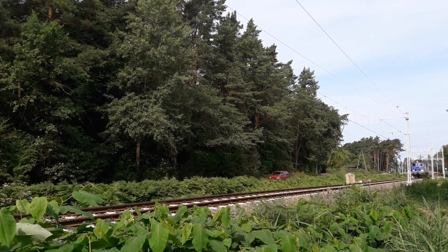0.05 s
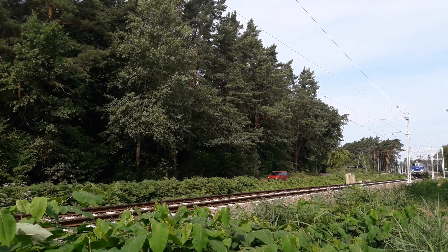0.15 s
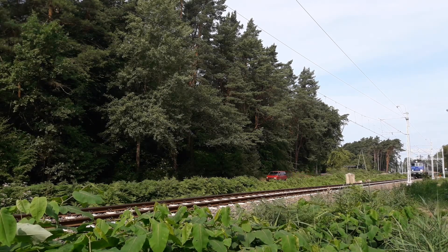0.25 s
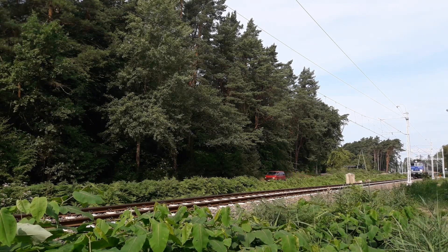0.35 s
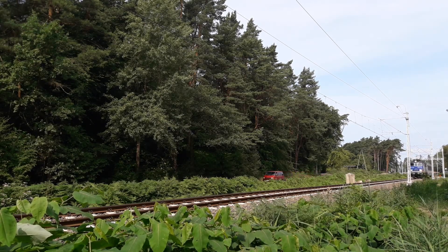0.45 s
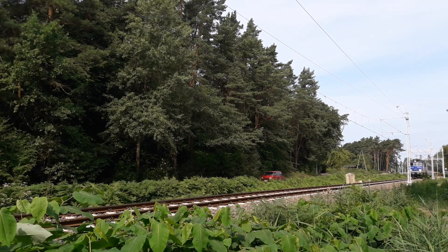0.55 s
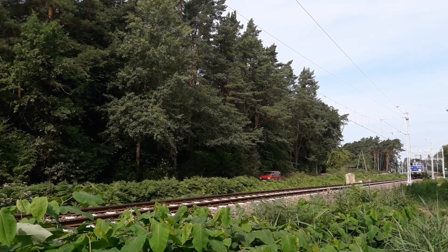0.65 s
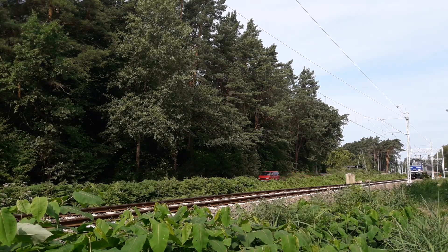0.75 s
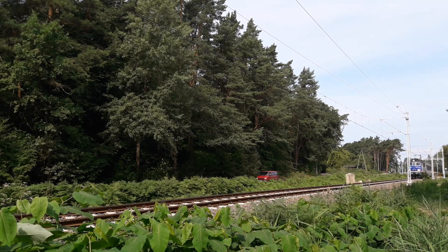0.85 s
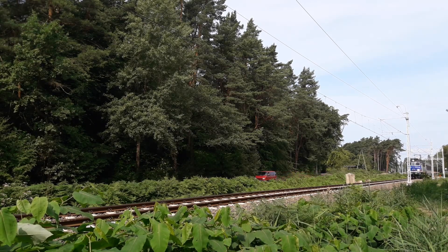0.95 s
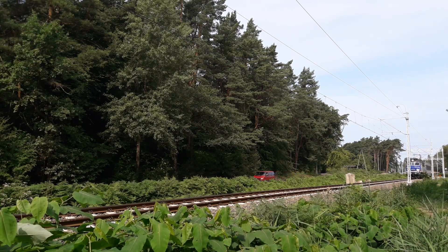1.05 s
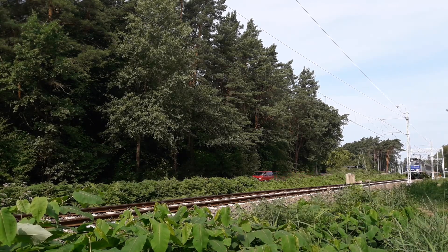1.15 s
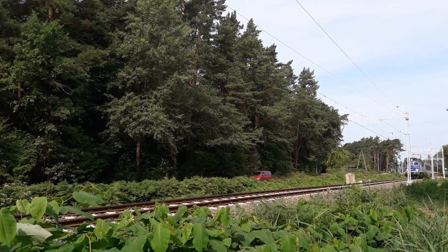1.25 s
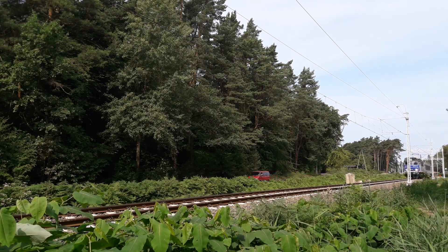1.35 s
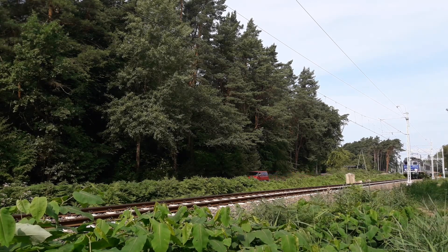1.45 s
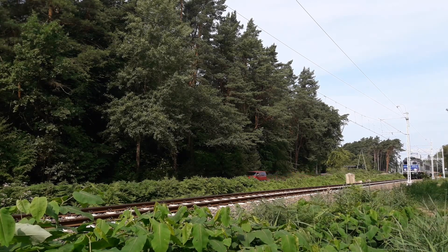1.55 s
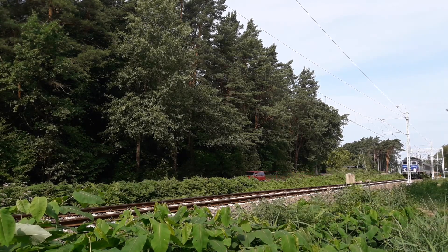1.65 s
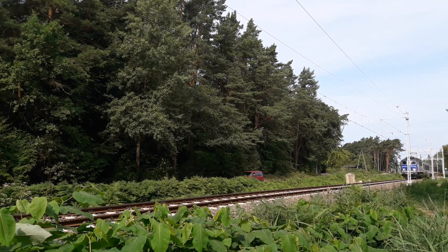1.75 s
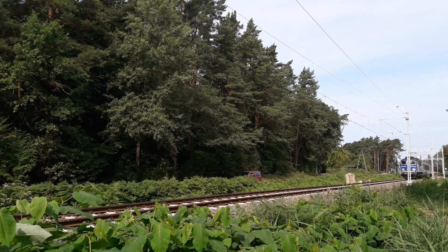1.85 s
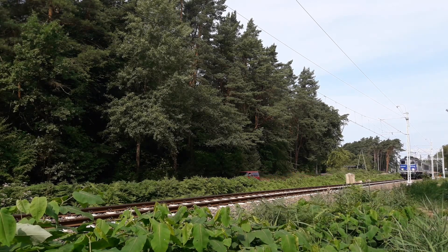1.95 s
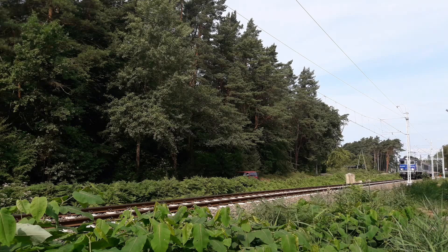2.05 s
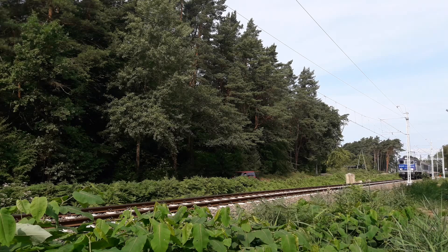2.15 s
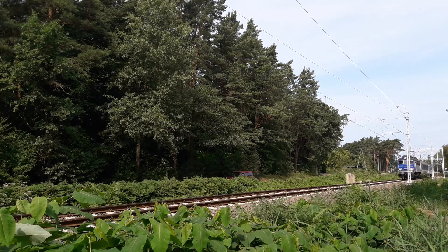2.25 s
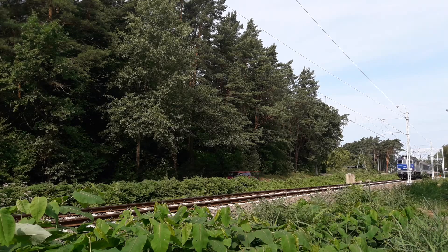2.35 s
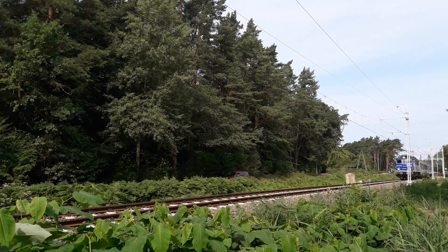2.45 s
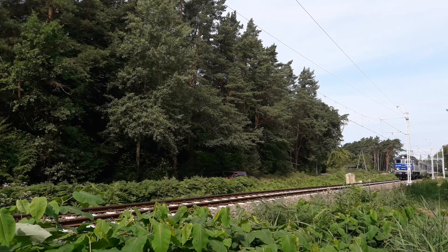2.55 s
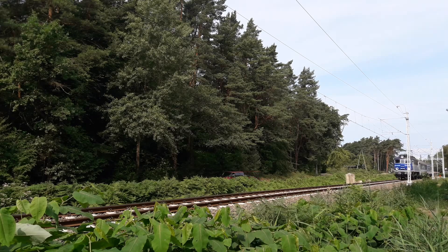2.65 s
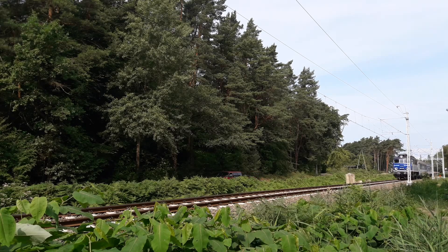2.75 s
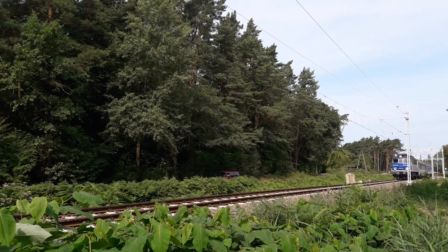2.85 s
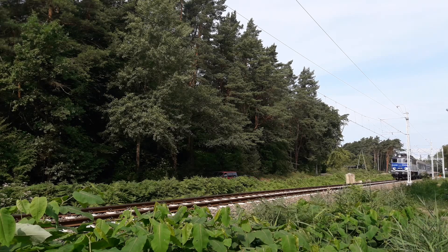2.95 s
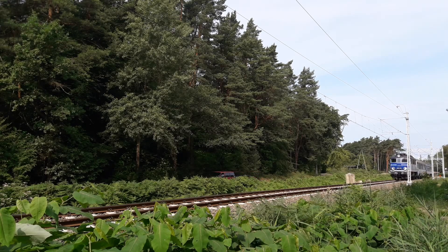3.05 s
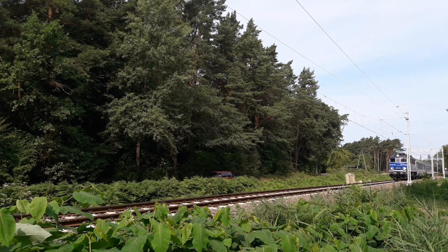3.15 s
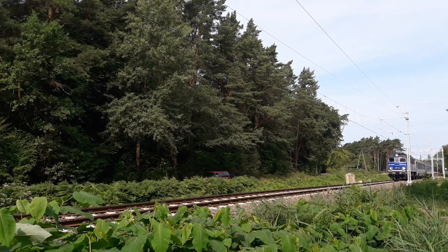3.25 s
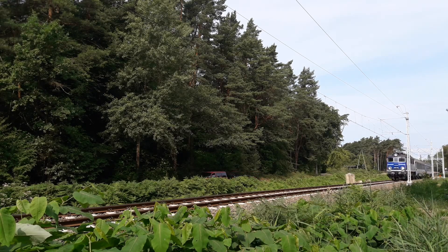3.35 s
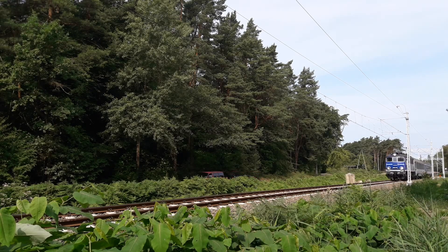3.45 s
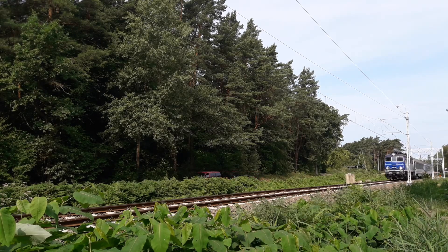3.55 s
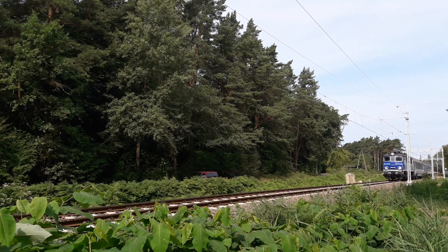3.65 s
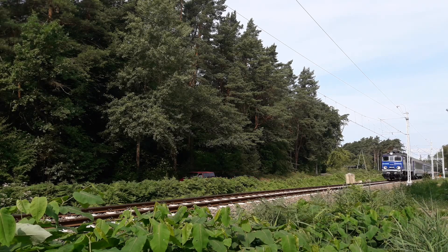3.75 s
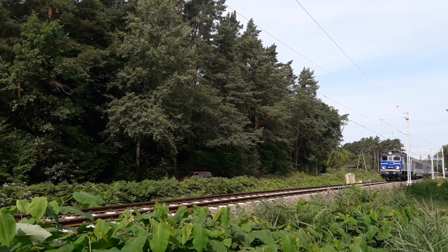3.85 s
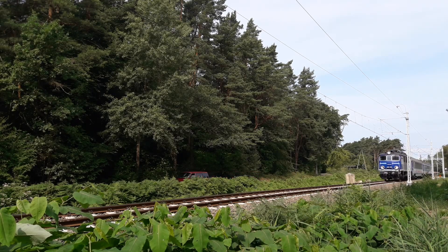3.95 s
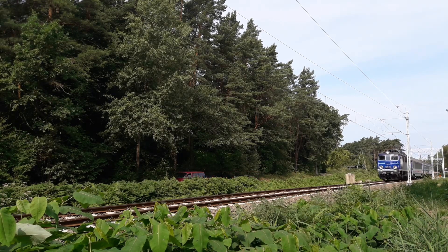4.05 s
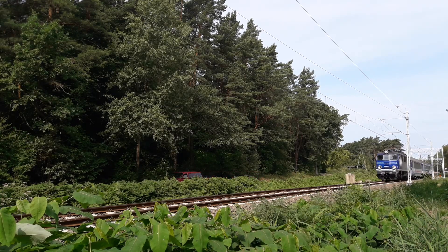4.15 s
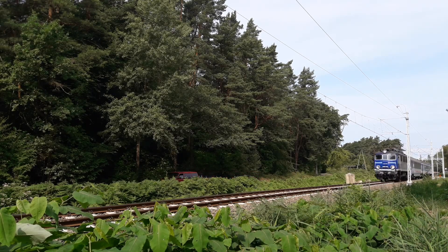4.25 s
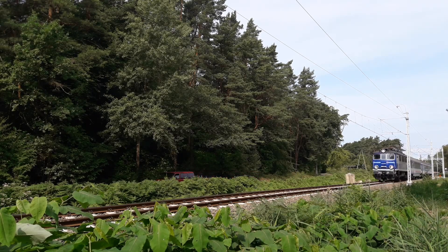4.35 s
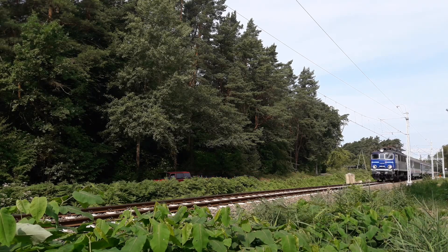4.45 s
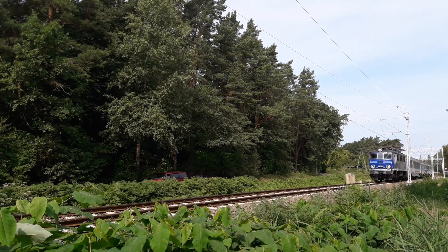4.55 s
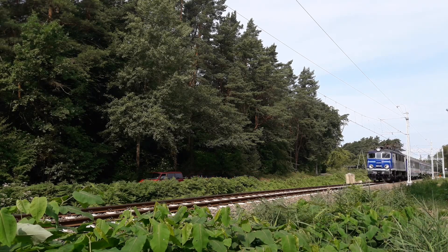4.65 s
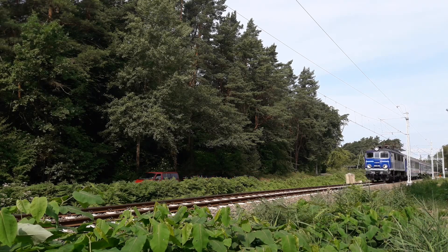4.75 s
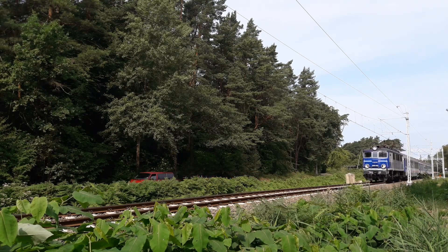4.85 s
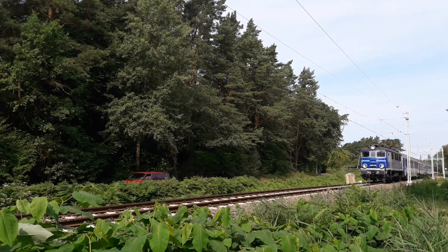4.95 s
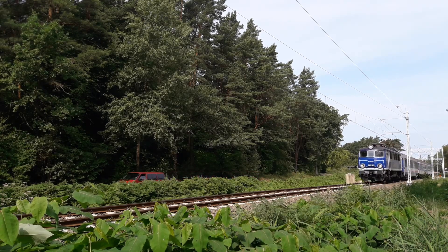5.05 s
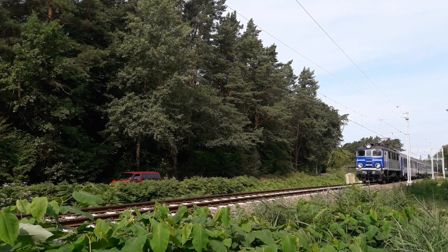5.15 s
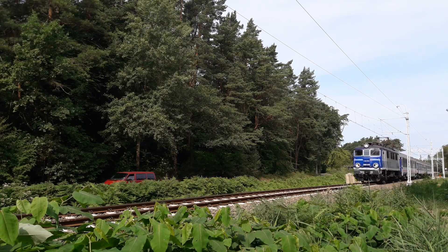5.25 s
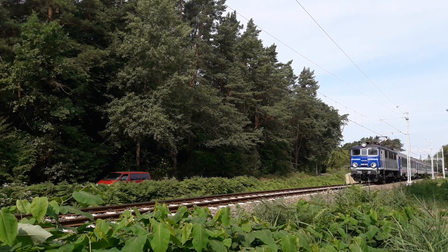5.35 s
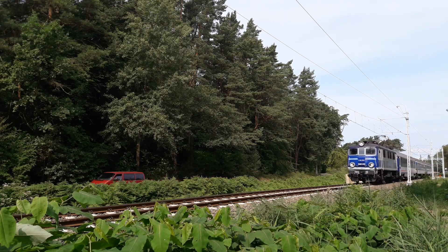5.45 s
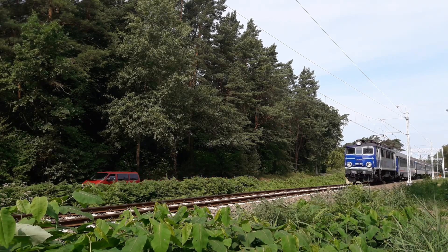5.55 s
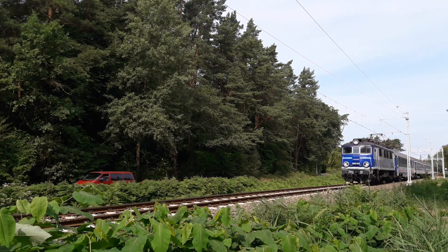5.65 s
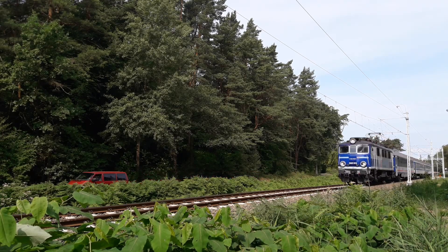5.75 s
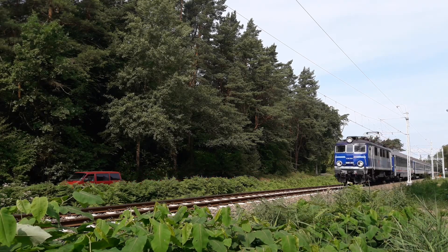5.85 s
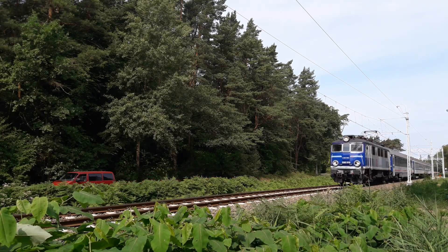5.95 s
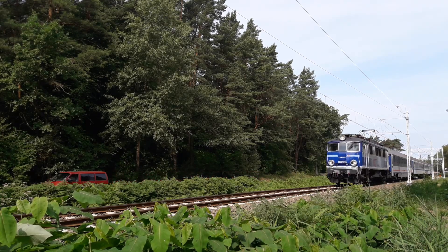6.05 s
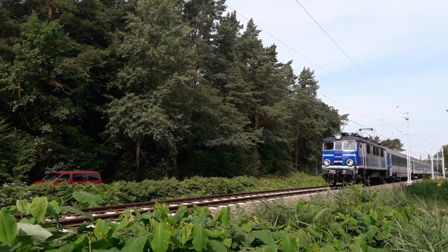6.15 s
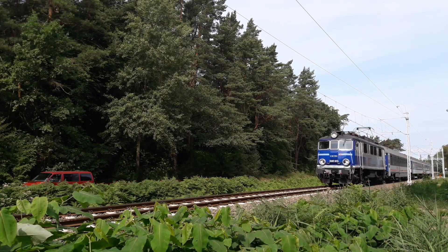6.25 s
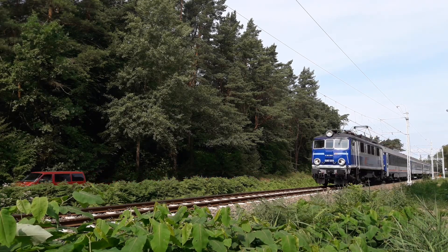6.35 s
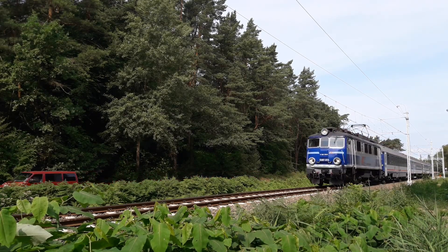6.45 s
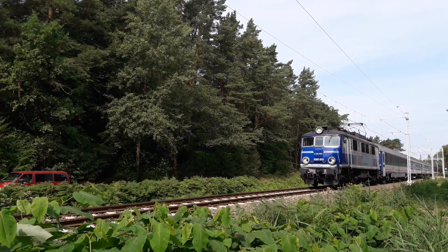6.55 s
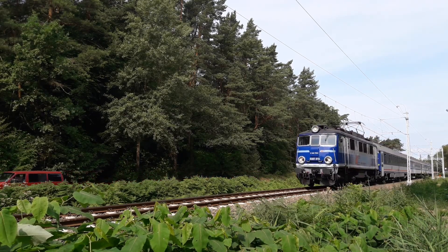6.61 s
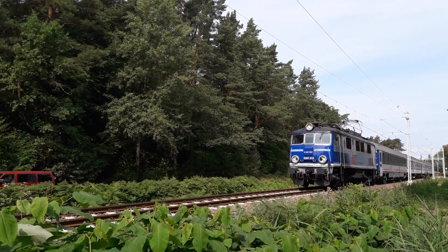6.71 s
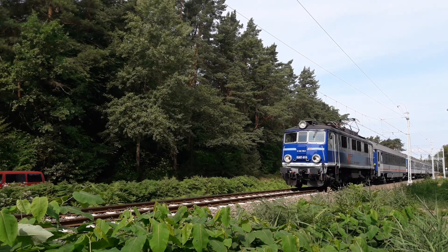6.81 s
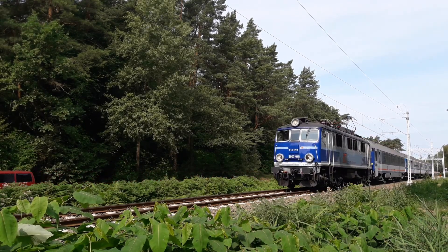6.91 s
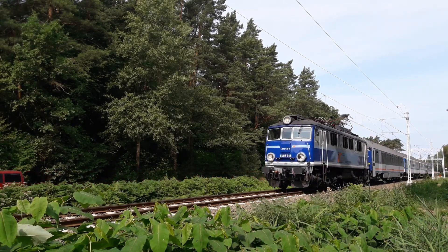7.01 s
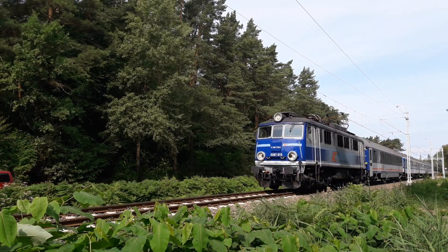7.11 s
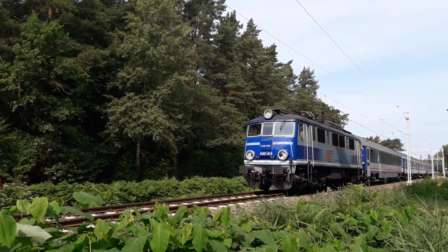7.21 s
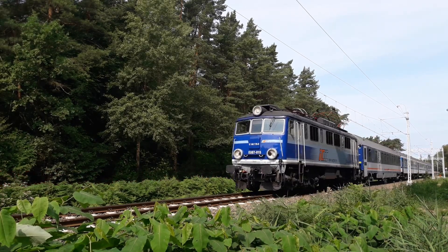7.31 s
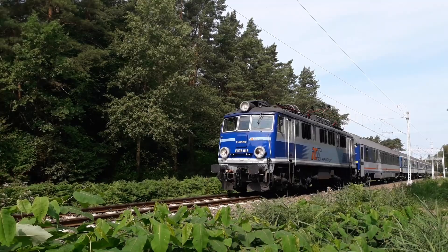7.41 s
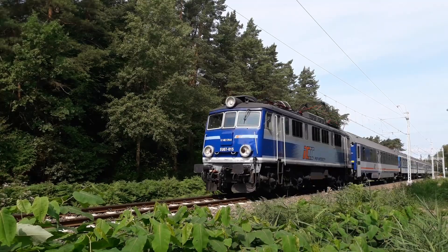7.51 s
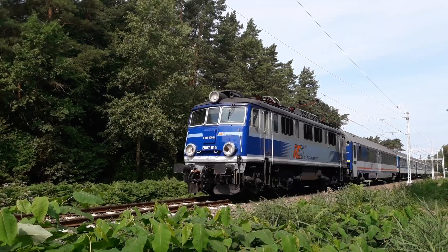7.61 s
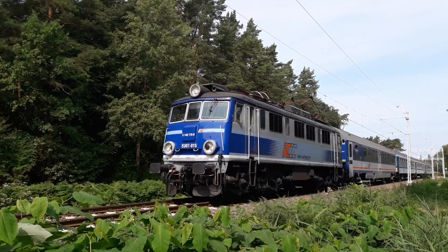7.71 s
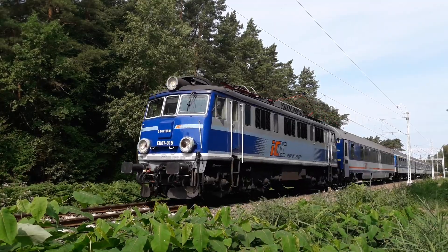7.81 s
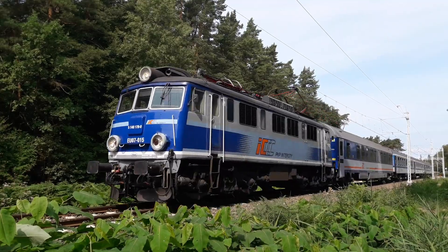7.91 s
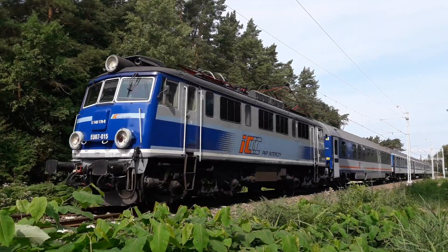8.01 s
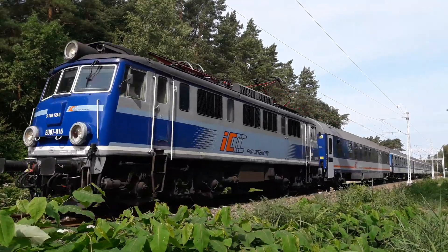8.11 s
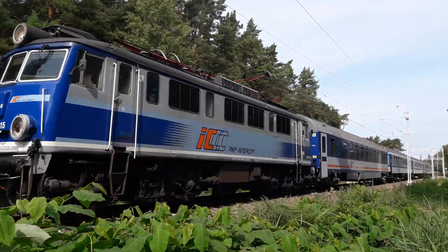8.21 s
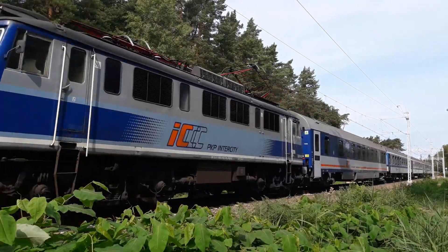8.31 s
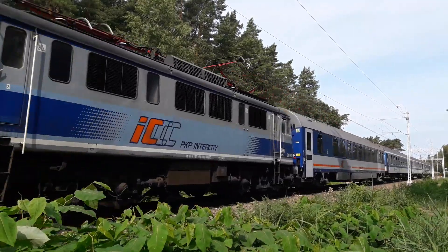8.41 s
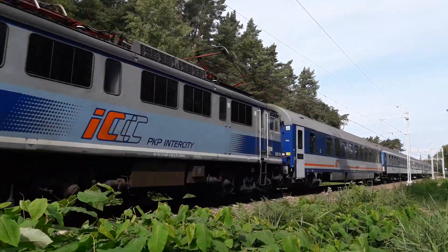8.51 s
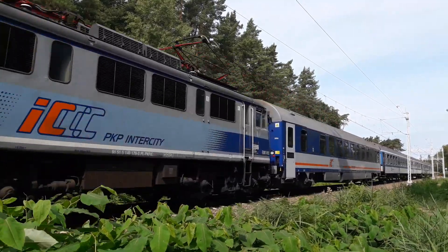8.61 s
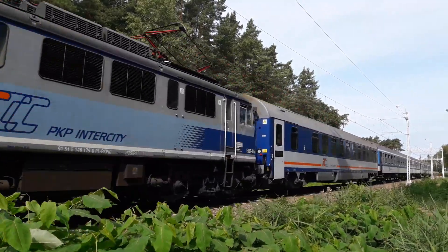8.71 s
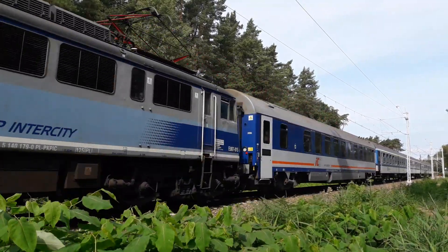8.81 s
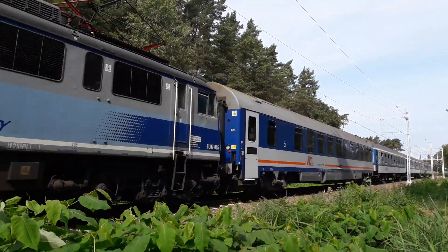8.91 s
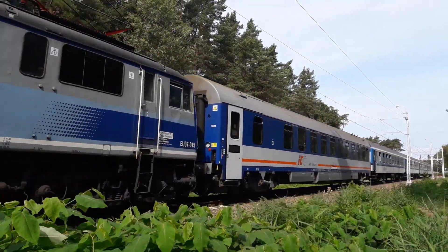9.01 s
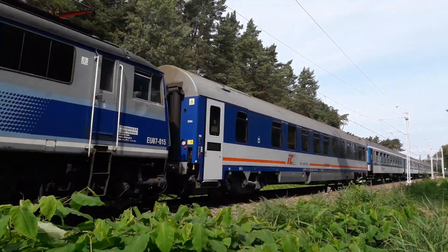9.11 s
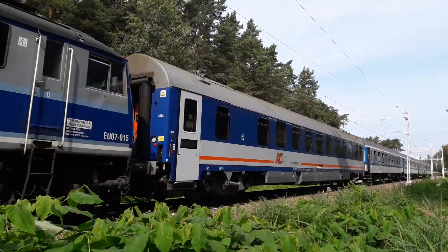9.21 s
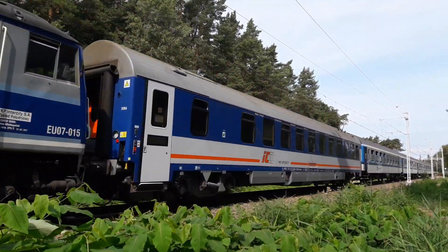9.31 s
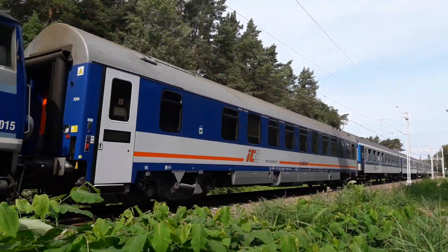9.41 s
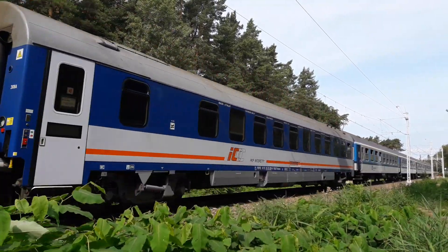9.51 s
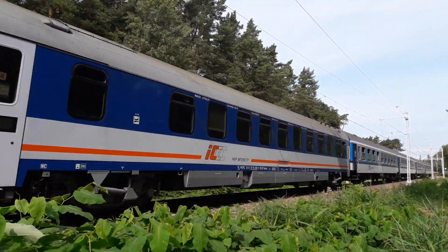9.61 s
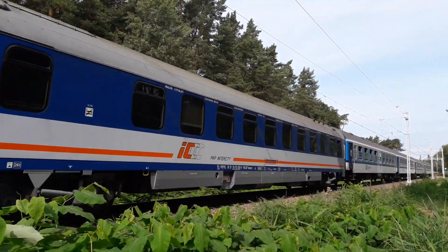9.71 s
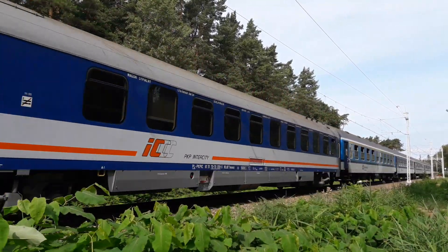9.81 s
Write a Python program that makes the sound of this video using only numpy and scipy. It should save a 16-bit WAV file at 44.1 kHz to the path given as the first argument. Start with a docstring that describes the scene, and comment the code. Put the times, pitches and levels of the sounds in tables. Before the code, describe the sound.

Heard from beside a railway line at a forest edge, the last of a distant horn fades out. An electric train draws near, its quiet rumble and singing rails swelling steadily under a wavering gear whine. The locomotive passes close and loud, its whine dropping in pitch as it goes by, and the first coach follows with knocks, hissing, ringing wheels and brief high swishes.

```python
"""Electric train at the forest edge

The last of a horn blast dies in the trees. The rails sing ahead of an electric locomotive and its
coaches, and the drive gears whine ever louder. Ground rumble, knocks and the hiss of steel on steel
swell as the first bogies pass close by, with ringing wheels and brief falling treble swishes."""
import sys
import numpy as np
from scipy import signal
from scipy.fft import rfft, irfft, next_fast_len
from scipy.io import wavfile
from scipy.ndimage import map_coordinates

SR = 44100
rng = np.random.default_rng(int(sys.argv[2]) if len(sys.argv) > 2 else 0)


def master_out(mix):
    """Clip the mix to full scale and print it as 16-bit PCM to the path in sys.argv[1]."""
    frames = np.transpose(np.atleast_2d(mix))
    ceiling = np.clip(frames, -1, 1)
    pcm = np.round(ceiling * 32767).astype(np.int16)
    wavfile.write(sys.argv[1], SR, pcm)


N = 435266
TIME = np.arange(N) / SR

# Noise colours, some as a far and near pair. Each row: frequency in Hz, relative level in dB.
GROUND_FAR = [(20, -38), (36, -22), (50, -6), (62, -12), (80, -1), (103, 2), (140, -1.5), (185, -3),
              (230, -10), (330, -44.5)]
GROUND_NEAR = [(20, -47), (36, -29), (50, -15), (62, -8), (80, -4.5), (108, 0.5), (135, -1.5), (180, 2),
               (230, -3.5), (330, -34.5)]
SLEEPERS_FAR = [(150, -29), (220, -4.5), (300, -1), (370, 1), (440, -3), (540, 4), (680, -6.5), (950, -39)]
SLEEPERS_NEAR = [(150, -28), (220, 2), (320, 1), (450, -1), (560, -2.5), (680, -19), (950, -37.5)]
RAILS_FAR = [(380, -22), (480, -10.5), (630, -5.5), (720, 4), (840, 0), (900, -3), (970, -0.5),
             (1060, -10.5), (1150, 2), (1215, 5), (1275, -3), (1340, 3.5), (1480, -13.5), (1900, -53)]
RAILS_NEAR = [(420, -30), (600, 3.5), (720, 5), (810, 1), (890, 5.5), (1000, 4), (1100, 0), (1230, 2.5),
              (1400, -3), (1550, -10), (1900, -25.5)]
WHEELS_FAR = [(1700, -20), (2300, 0.5), (3000, -1), (3700, 0.5), (4450, 0), (5000, -8), (5600, -10.5),
              (6800, -11.5), (7300, -35), (7750, -24), (8200, -16), (15000, -31.5)]
WHEELS_NEAR = [(1800, -24), (2400, 2), (3000, 4.5), (3500, -0.5), (4000, 1), (4450, -1.5), (4900, -6.5),
               (5600, -9.5), (6500, -12.5), (7300, -12), (8500, -14), (15000, -41)]
ROAR = [(900, -22), (1350, -2.5), (1550, 2.5), (1800, 3), (2000, -1), (2300, -6.5), (2700, -15),
        (4000, -27.5)]
SIZZLE = [(6500, -19), (8600, -11), (9600, 0), (10800, 5), (11700, -2), (12700, 3), (13500, 3), (14500, -6),
          (16000, -8)]
HISS = [(3000, -10), (8000, -5), (10200, -4), (11500, 2.5), (16000, 2)]
BREEZE = [(15, -27), (32, -18), (50, 10), (65, 7), (100, -9), (200, -63)]
KNOCK_COLOUR = [(450, -24), (720, 10), (1000, 5), (1400, -16), (4000, -34), (9000, -58)]
THUD_COLOUR = [(50, -26), (85, -6), (120, -1), (160, -9), (260, -52)]
# The microphone's dull top and its steep cutoff. Each row: frequency in Hz, gain in dB.
MICROPHONE_EQ = [(20, 2.5), (7100, -0.5), (7550, -10.5), (8050, -18), (9000, -17.5), (16000, -25)]
HIGH_CUT = [(15700, 0), (15850, -90)]

# The horn's timbre. Each row: harmonic number, relative level in dB.
HORN_HARMONICS = [(1, -4.5), (2, -5.5), (3, -25), (4, -24), (5, -36)]
# The blowers' two-note hum. Each row: pitch in Hz, relative level in dB.
BLOWER_TONES = [(401.4, 1.5), (177.4, 0)]
# Swells of blower hum and low rumble. Each row: level in dB, peak time and half-width in seconds.
BLOWER_SWELLS = [(-36, 7.0, .2), (-42, 7.7, .6)]
RUMBLE_SWELLS = [(-45, 2.83, 0.33), (-43, 5.9, 0.22), (-38, 7.37, 0.28)]
# Wheel knocks and running-gear thuds. Each row: start in seconds, relative level in dB.
KNOCKS = [(4.19, -19), (5.512, -10), (7.543, -10), (8.104, -10), (8.153, -14.5), (9.15, -9), (9.434, -12),
          (9.525, -6)]
THUDS = [(0.381, -32), (3.189, -29), (3.559, -28), (6.369, -22), (8.303, -22), (8.729, -21.5),
         (9.247, -34.5), (9.599, -26)]

# The cross-fade from far to near colours. Each row: time in seconds, closeness from 0 to 1.
CLOSENESS = [(0, 0.07), (3, 0.24), (5, 0.17), (6.5, 0.44), (7.5, 0.91), (8.2, 0.96), (9.87, 0.85)]
# Two bogies under the locomotive, then the coaches'.
# Each row: time abreast in seconds, weight on the track in dB, wheel noise in dB.
BOGIES = [(8.22, -1.0, .1), (8.75, -3.4, -.2), (9.35, 3.9, -1.0), (10.25, 1.3, -6.5), (10.55, 1.3, -6.5)]
# How each sound of a bogie carries.
# Each gives: base level in dB, distance abreast in metres, dB lost per doubling, dB lost per metre.
GROUND_CARRY = (-32.5, 14.5, 6, 0.02)
SLEEPERS_CARRY = (-23.3, 10.5, 5, 0.054)
RAILS_CARRY = (-25.8, 11, 4.2, 0.0168)
ROAR_CARRY = (-27, 8, 5.25, 0.024)
WHEELS_CARRY = (-26.8, 6, 5.5, 0.044)
SIZZLE_CARRY = (-33.2, 6.5, 5.5, 0.058)
# The bounce off the ground. Each row: time in seconds, first notch in Hz, strength from 0 to 1.
GROUND_ECHO = [(0, 5350, .13), (5.5, 4800, 0.12), (6.7, 3340, 0.25), (8, 2861, 0.53), (9.35, 2460, 0.25),
               (9.55, 2000, 0.34), (9.87, 1250, 0)]
# Treble accents: a soft band of hiss near 7 kHz swells and fades around 6.75 s, two brief falling swishes (5900
# and 11800 Hz) come as the coach passes, and the rest are ringing wheels. Each row: centre in Hz, scatter in
# Hz, level in dB, peak time and half-width in seconds, fall in Hz per second.
TREBLE_ACCENTS = [(1516, 22, -31.5, 8.87, .16, 5), (1520, 20, -31, 9.6, .3, 5),
                  (2930, 150, -37, 9.0, .4, 60), (2520, 260, -32, 9.67, .14, 1500),
                  (4490, 110, -47, 7.1, .7, 50), (4350, 45, -35.5, 8.45, .25, 160),
                  (7100, 500, -52, 6.75, .55, 0), (11130, 70, -51, 7.32, .22, 60),
                  (10450, 400, -46, 8.0, .2, 700), (13280, 80, -45.5, 8.12, .17, 100),
                  (13900, 400, -47.5, 7.9, .22, 900), (12900, 400, -44, 8.85, .04, 900),
                  (5900, 400, -42, 9.42, .07, 3000), (11800, 400, -45, 9.37, .09, 5000)]

# The gear mesh, climbing as the train gathers speed. Each row: time in seconds, pitch in Hz.
GEAR_PITCH = [(0, 233.9), (3.3, 236.7), (5.3, 242.3), (7.6, 251.5), (8.5, 253.6), (9.15, 249.4),
              (9.87, 249.3)]
# The whine's fader moves. Each row: time in seconds, fundamental in dB, octave in dB.
GEAR_LEVELS = [(0, -55.5, -55), (3.2, -49.5, -53), (3.6, -41.5, -48), (4.6, -37.5, -45), (7.0, -33.5, -32),
               (7.45, -29, -32), (7.7, -26.5, -22), (8.13, -24, -21), (8.3, -14.5, -22.5),
               (8.8, -13.5, -19), (8.97, -13.5, -25), (9.4, -20, -21.5), (9.87, -19.5, -24.5)]
# Brief surges and dips of the fundamental. Each row: time in seconds, change in dB.
GEAR_SURGES = [(4.56, 7.5), (5.14, 8.5), (5.36, 5), (5.6, -11), (6.07, 3), (7.17, 10), (7.26, -11),
               (7.39, 8), (8.85, -12.5), (9.34, -8), (9.66, 6)]
# Gear overtones, each loudest as it faces the listener.
# Each row: multiple of the mesh pitch, scatter in Hz, level in dB, peak time and half-width in seconds.
GEAR_OVERTONES = [(3, 18, -35, 7.46, 0.62), (3, 6.9, -23.5, 7.83, 0.084), (3, 4.7, -24, 8.2, 0.074),
                  (3, 8.3, -26.5, 8.9, 0.29), (3.5, 7.1, -39.5, 9.1, 0.52), (6, 26, -31.5, 8.9, 1),
                  (7, 10, -36, 8, 1), (9, 20, -44, 7.2, 0.96)]

SPEED_M_PER_S = 20
HORN_HZ, HORN_SIDE_HZ = 750, 740
HORN_END_S, HORN_T60_S, HORN_TAIL_T60_S = 0.13, 2.1, 3.0
BEAT_HZ, BEAT_WANDER_HZ = 7.8, 1.98
RECEDING_HZ, RECEDING_RISE_HZ_PER_S, RECEDING_PEAK_S = 218.2, 10.5, 9.2


def from_db(db):
    """Decibels to gain."""
    return 10 ** (np.asarray(db) / 20)


def unit_rms(x):
    """Scale to unit rms."""
    return x / np.sqrt(np.mean(x ** 2) + 1e-20)


def automation(rows):
    """One curve per column, drawn through the times in the first."""
    times, *columns = np.transpose(rows)
    return [np.interp(TIME, times, column) for column in columns]


def swell(db, peak_s, half_width_s):
    """A bell-shaped fade in and out."""
    return from_db(db) * np.exp(-0.5 * ((TIME - peak_s) / half_width_s) ** 2)


def blows(rows, t60):
    """An envelope that jumps at each blow and dies away."""
    clicks = np.zeros(N)
    for start_s, db in rows:
        clicks[round(start_s * SR)] = from_db(db)
    return signal.lfilter([1], [1, -from_db(-60 / (t60 * SR))], clicks + 1e-18)


def equalise(x, points):
    """Apply an EQ curve drawn on a log-frequency axis."""
    hz, db = np.transpose(points)
    size = next_fast_len(N)
    bins_hz = np.maximum(np.fft.rfftfreq(size, 1 / SR), 1)
    gain = from_db(np.interp(np.log(bins_hz), np.log(hz), db))
    return irfft(rfft(x, size) * gain, size)[:N]


def noise(colour):
    """Noise of the given colour at unit rms."""
    return unit_rms(equalise(rng.standard_normal(N), colour))


def drift(rate_hz):
    """A random wobble of unit rms, moving at up to the given rate."""
    step, settle = 40, 2000
    lowpass = signal.butter(2, np.clip(rate_hz, 0.3, 400), fs=SR / step, output="sos")
    slow = signal.sosfilt(lowpass, rng.standard_normal(N // step + settle + 2))[settle:]
    return np.interp(np.arange(N) / step, np.arange(len(slow)), unit_rms(slow))


def tone(hz, wet, scatter_hz):
    """A tone whose wet share is smeared into a band of noise, as by many shifting paths."""
    phase = 2 * np.pi * np.cumsum(hz * np.ones(N)) / SR
    smear = drift(scatter_hz) * np.cos(phase) + drift(scatter_hz) * np.sin(phase)
    return np.sqrt(2 * (1 - wet)) * np.sin(phase) + np.sqrt(wet) * smear


def nearing_noise(far, near):
    """Noise that cross-fades from its far to its near colour at constant power."""
    closeness, = automation(CLOSENESS)
    return np.sqrt(1 - closeness) * noise(far) + np.sqrt(closeness) * noise(near)


def passing(carry, trims_db):
    """The summed level of all bogies, each fading with its distance."""
    base_db, abreast_m, doubling_db, per_metre_db = carry
    coarse_time = TIME[::100]
    power = 0
    for (abreast_s, _, _), trim_db in zip(BOGIES, trims_db):
        metres = np.hypot(SPEED_M_PER_S * (coarse_time - abreast_s), abreast_m)
        loss_db = doubling_db * np.log2(metres / abreast_m) + per_metre_db * metres
        power += from_db(base_db + trim_db - loss_db) ** 2
    return np.interp(TIME, coarse_time, np.sqrt(power))


def over_ground(x):
    """The grazing echo comes inverted and ever later, so its notches sweep down as the wheels near."""
    notch_hz, strength = automation(GROUND_ECHO)
    echo = map_coordinates(x, [np.arange(N) - SR / notch_hz], order=3)
    return (x - strength * echo) / np.sqrt(1 + strength ** 2)


def breeze():
    """Light air rumbles at the microphone."""
    return from_db(-59) * noise(BREEZE)


def horn():
    """The forest holds the end of the blast; echoes from the side are less raised in pitch."""
    since_end = np.maximum(TIME - HORN_END_S, 0)
    decay = from_db(-60 * since_end / HORN_T60_S)
    faint_tail = from_db(-16 - 60 * since_end / HORN_TAIL_T60_S)
    forest_slap = swell(-49, peak_s=0.53, half_width_s=0.042)
    level = from_db(-38) * np.maximum(decay, faint_tail) + forest_slap
    ahead = sum(from_db(db) * tone(HORN_HZ * k, wet=0.7, scatter_hz=6 * k) for k, db in HORN_HARMONICS)
    side = from_db(1.5) * tone(HORN_SIDE_HZ, wet=0.33, scatter_hz=7.2)
    return level * (ahead + side)


def blowers():
    """The locomotive's fans hum, swelling on the approach."""
    hum = sum(from_db(db) * tone(hz, wet=0.38, scatter_hz=6) for hz, db in BLOWER_TONES)
    return sum(swell(*row) for row in BLOWER_SWELLS) * hum


def impacts():
    """Wheels knock on flaws in the rail; the running gear thuds."""
    knocks = blows(KNOCKS, t60=0.18) * noise(KNOCK_COLOUR)
    thuds = blows(THUDS, t60=0.12) * noise(THUD_COLOUR)
    return from_db(-12.5) * knocks + from_db(-5.5) * thuds


def track_rumble():
    """The low end: passing axles shake the ground and the sleepers; the deepest part carries farthest."""
    _, weight_db, _ = np.transpose(BOGIES)
    ground = passing(GROUND_CARRY, weight_db) * nearing_noise(GROUND_FAR, GROUND_NEAR)
    sleepers = passing(SLEEPERS_CARRY, weight_db) * from_db(1.34 * drift(7.6))
    sleepers *= nearing_noise(SLEEPERS_FAR, SLEEPERS_NEAR)
    swells = sum(swell(*row) for row in RUMBLE_SWELLS) * noise(GROUND_FAR)
    return ground + sleepers + swells


def rolling():
    """Rough steel on steel: the rails sing far ahead, the wheels take over close by."""
    _, weight_db, wheel_db = np.transpose(BOGIES)
    flutter = drift(14.5)  # uneven treads shake rails and wheels together
    rails = passing(RAILS_CARRY, weight_db) * from_db(0.41 * flutter)
    rails *= nearing_noise(RAILS_FAR, RAILS_NEAR)
    roar = passing(ROAR_CARRY, wheel_db) * from_db(0.25 * drift(23)) * noise(ROAR)
    wheels = passing(WHEELS_CARRY, wheel_db) * from_db(0.82 * flutter)
    wheels *= nearing_noise(WHEELS_FAR, WHEELS_NEAR)
    sizzle_db = 5.2 * wheel_db  # the top end differs far more from bogie to bogie
    sizzle = passing(SIZZLE_CARRY, sizzle_db) * from_db(1.3 * drift(18)) * noise(SIZZLE)
    return rails + over_ground(roar + wheels + sizzle)


def treble_accents():
    """Narrow bands swell and fade: a soft hiss, wheels ringing as they pass, brief falling swishes."""
    bands = np.zeros(N)
    for hz, scatter_hz, db, peak_s, half_width_s, fall in TREBLE_ACCENTS:
        level = swell(db + 2.2 * drift(5.6), peak_s, half_width_s)
        bands += level * tone(hz - fall * (TIME - peak_s), wet=0.9, scatter_hz=scatter_hz)
    return bands


def gear_whine():
    """Meshing gears sing; a second axle runs slightly flat and beats against the first."""
    hz, = automation(GEAR_PITCH)
    fundamental_db, octave_db = automation(GEAR_LEVELS)
    surge_db = sum(db * swell(0, peak_s, half_width_s=0.025) for peak_s, db in GEAR_SURGES)
    flat_hz = hz - BEAT_HZ + BEAT_WANDER_HZ * drift(3.26)
    second_axle = from_db(-6) * tone(flat_hz, wet=0.14, scatter_hz=15)
    first_axle = tone(hz, wet=0.11, scatter_hz=12.2)
    duck = 1 - swell(0, peak_s=8.5, half_width_s=0.23)  # no beating while the first axle is abreast
    whine = from_db(fundamental_db + surge_db) * (first_axle + duck * second_axle)
    whine += from_db(octave_db + 2.5 * drift(9.2)) * tone(2 * hz, wet=0.35, scatter_hz=11.5)
    for multiple, scatter_hz, db, peak_s, half_width_s in GEAR_OVERTONES:
        whine += swell(db, peak_s, half_width_s) * tone(multiple * hz, wet=0.54, scatter_hz=scatter_hz)
    return whine


def receding_whine():
    """The gears of a bogie that has gone past sound lower."""
    hz = RECEDING_HZ + RECEDING_RISE_HZ_PER_S * (TIME - RECEDING_PEAK_S)
    fade_in = np.clip((TIME - 8.76) / 0.12, 0, 1)
    level = fade_in * swell(-20, RECEDING_PEAK_S, half_width_s=0.43)
    return level * tone(hz, wet=0.038, scatter_hz=9.2)


def scene():
    """The mono mix, heard from beside the line."""
    tones = horn() + gear_whine() + receding_whine() + blowers()
    running = track_rumble() + rolling() + treble_accents() + impacts()
    return (tones + running + breeze())[None]


def record(dry):
    """A small microphone with a dull top and faint hiss of its own; the highest peaks are rounded."""
    rounded = dry[0] / (1 + dry[0] ** 8) ** (1 / 8)
    heard = equalise(rounded, MICROPHONE_EQ) + from_db(-69.5) * noise(HISS)
    return equalise(heard, HIGH_CUT)[None]


dry = scene()
out = record(dry)
master_out(out)
```